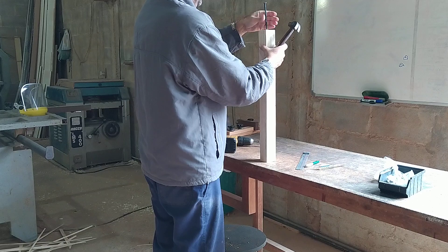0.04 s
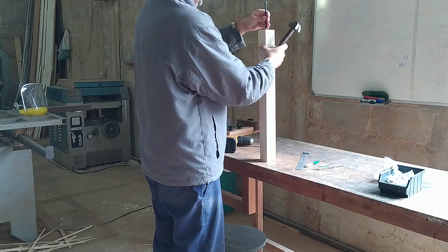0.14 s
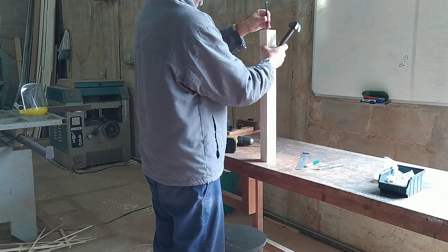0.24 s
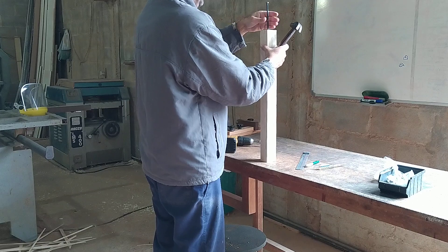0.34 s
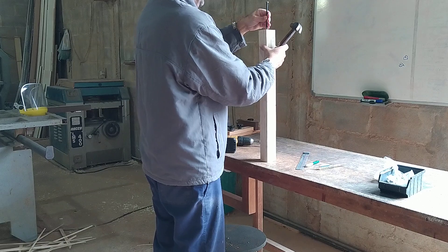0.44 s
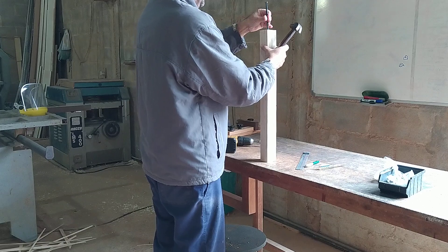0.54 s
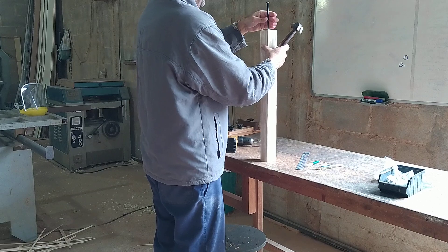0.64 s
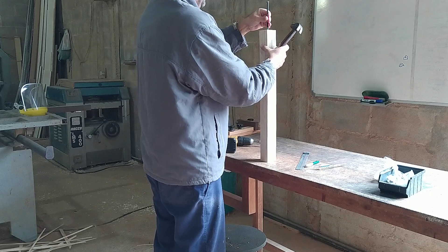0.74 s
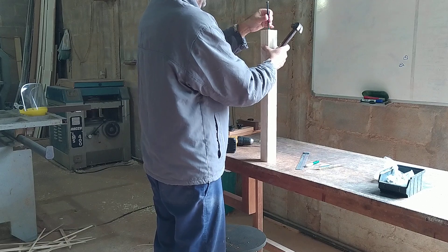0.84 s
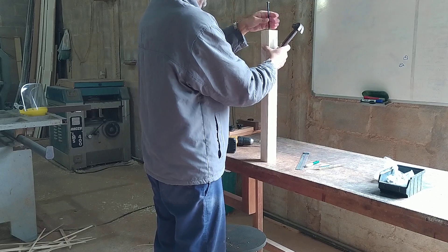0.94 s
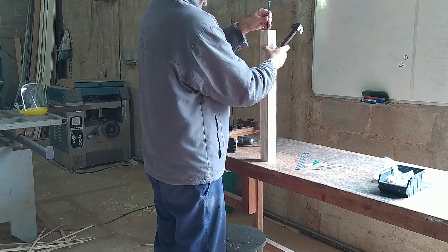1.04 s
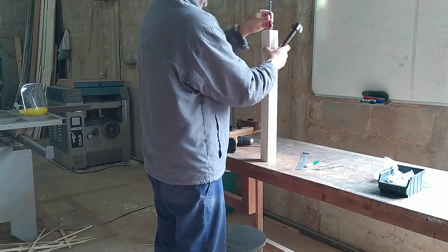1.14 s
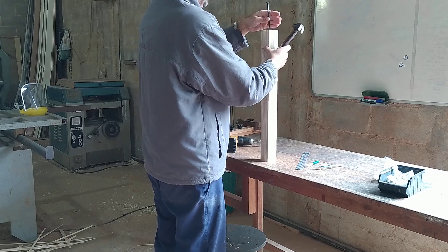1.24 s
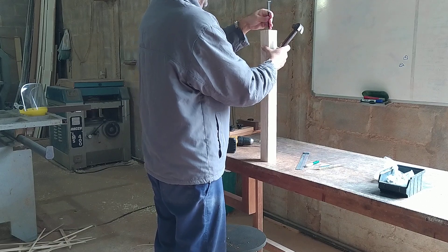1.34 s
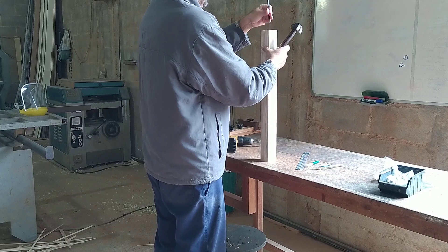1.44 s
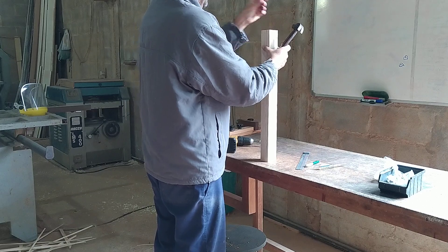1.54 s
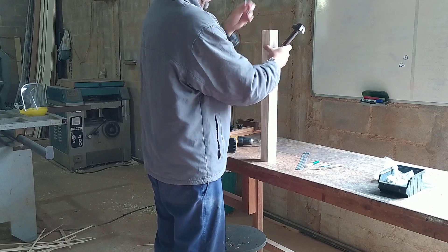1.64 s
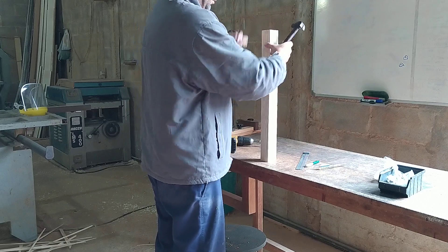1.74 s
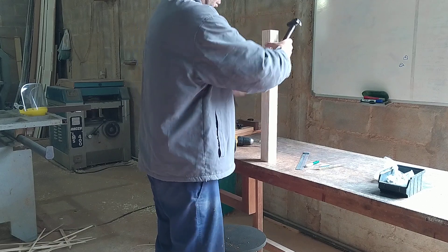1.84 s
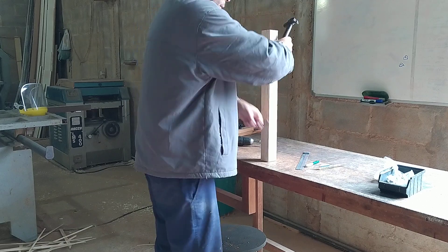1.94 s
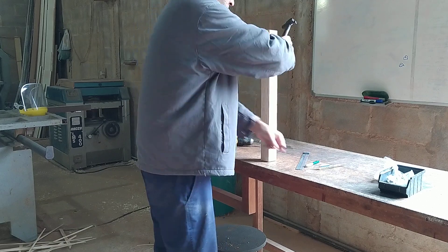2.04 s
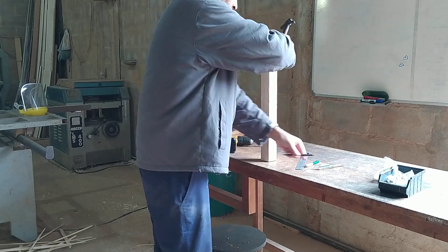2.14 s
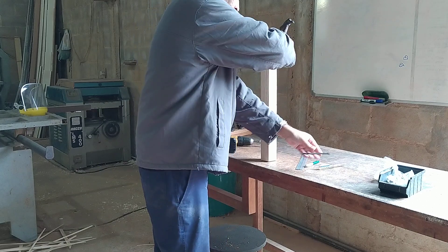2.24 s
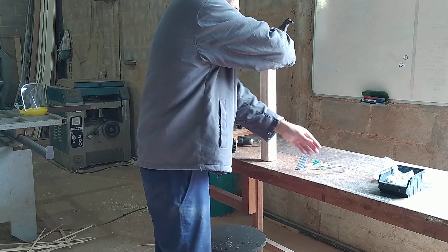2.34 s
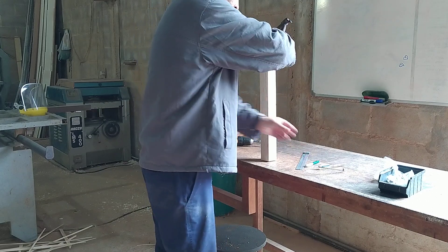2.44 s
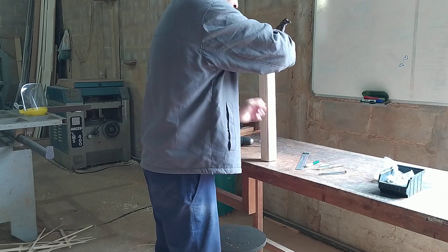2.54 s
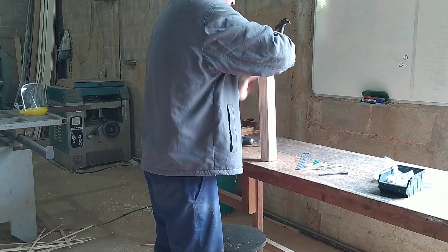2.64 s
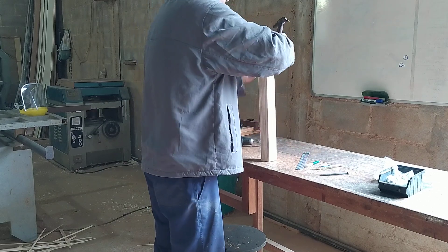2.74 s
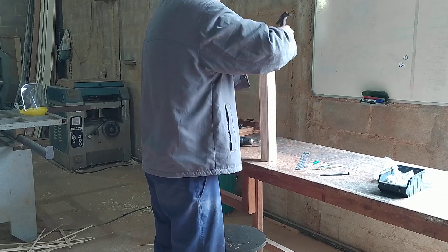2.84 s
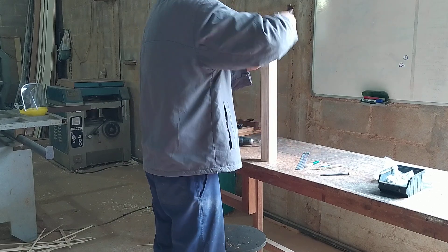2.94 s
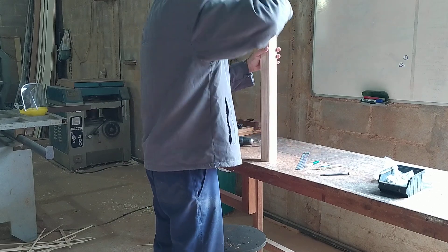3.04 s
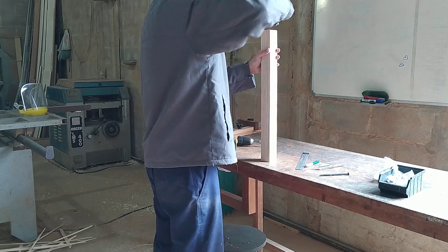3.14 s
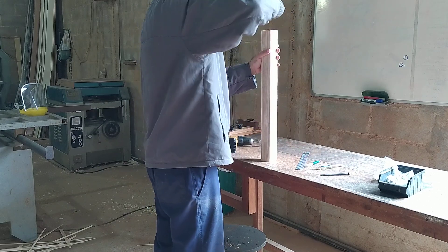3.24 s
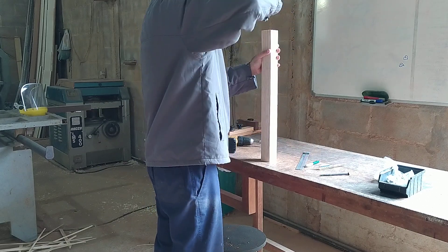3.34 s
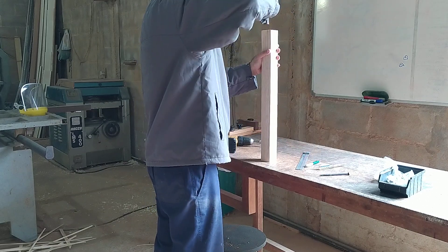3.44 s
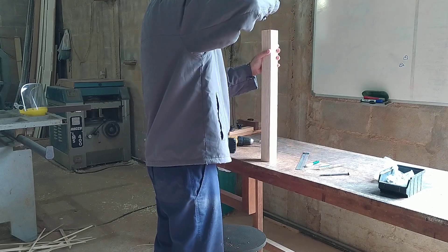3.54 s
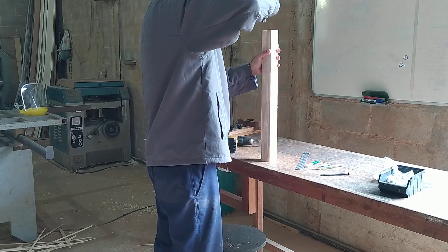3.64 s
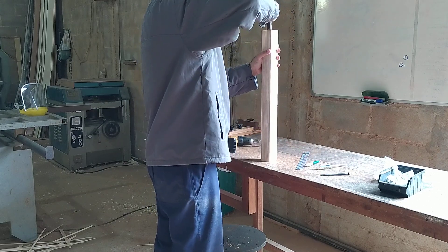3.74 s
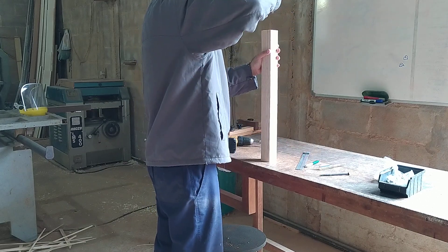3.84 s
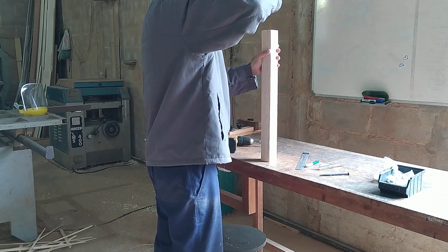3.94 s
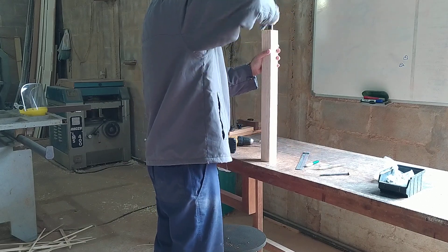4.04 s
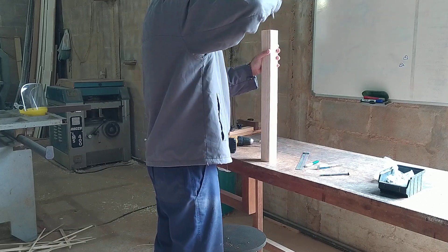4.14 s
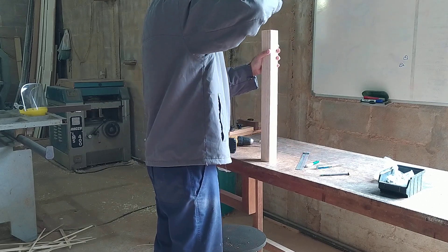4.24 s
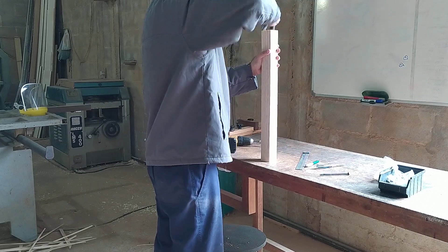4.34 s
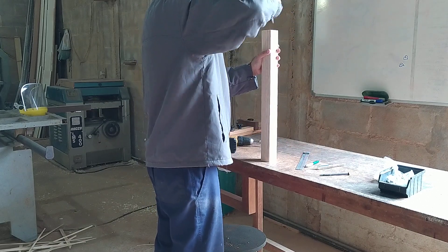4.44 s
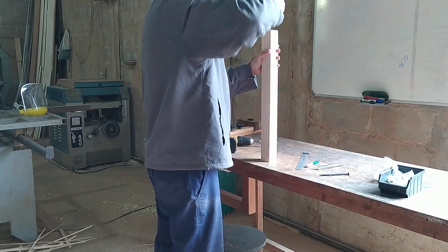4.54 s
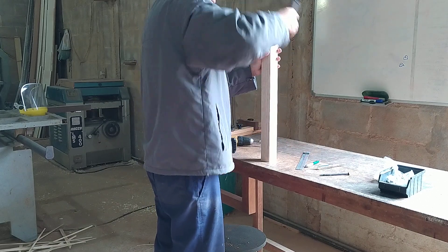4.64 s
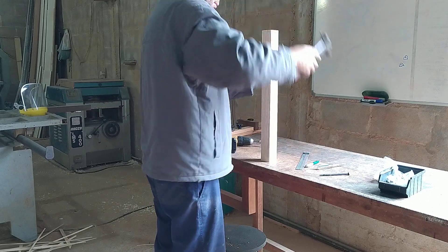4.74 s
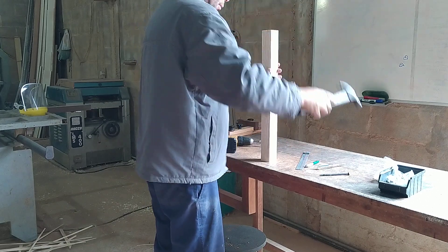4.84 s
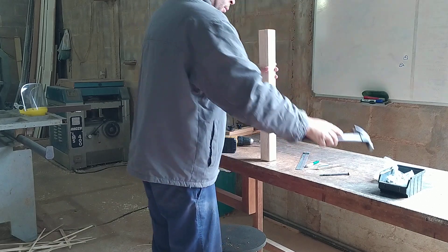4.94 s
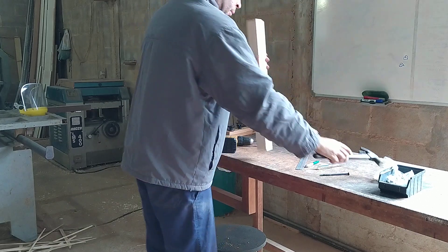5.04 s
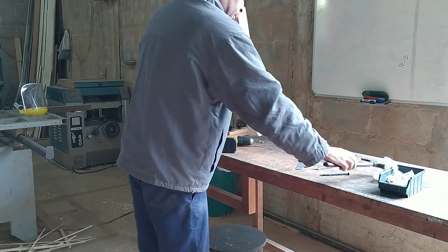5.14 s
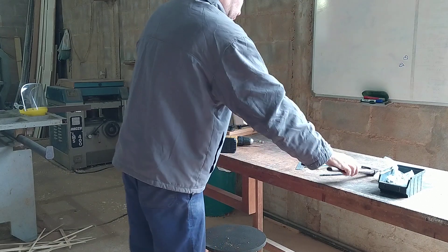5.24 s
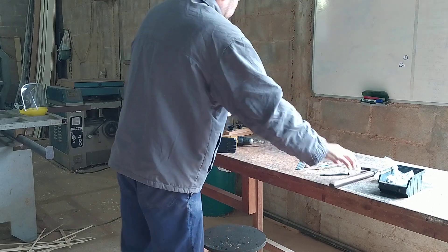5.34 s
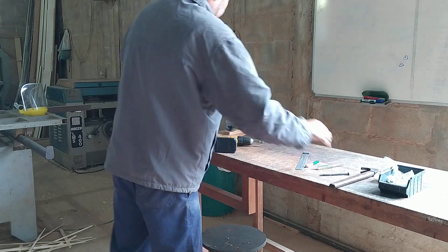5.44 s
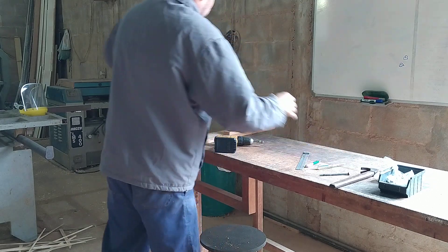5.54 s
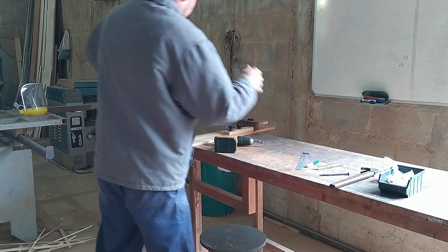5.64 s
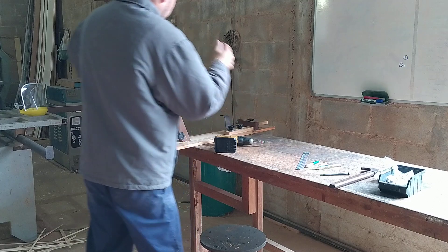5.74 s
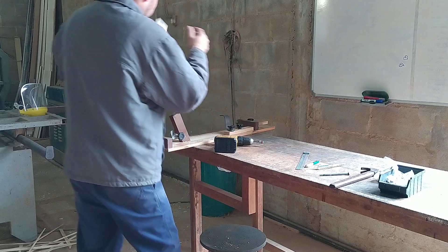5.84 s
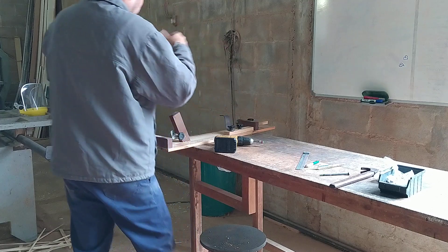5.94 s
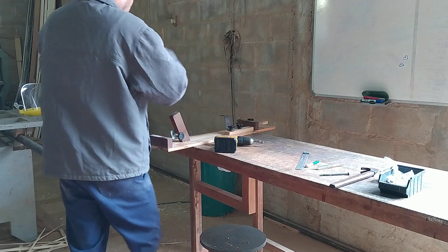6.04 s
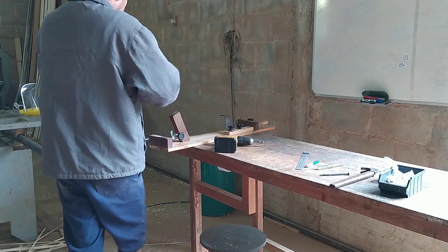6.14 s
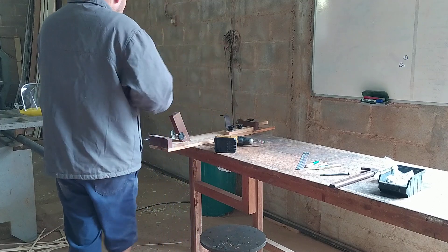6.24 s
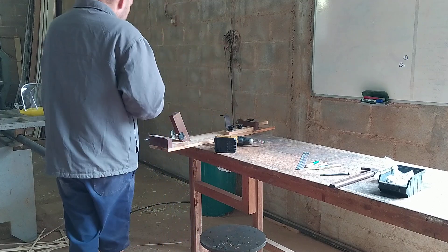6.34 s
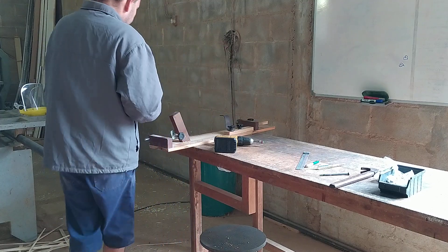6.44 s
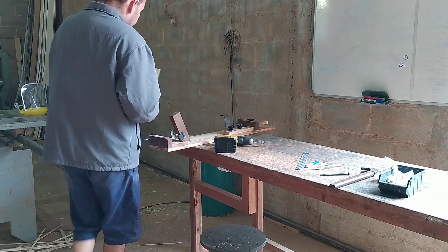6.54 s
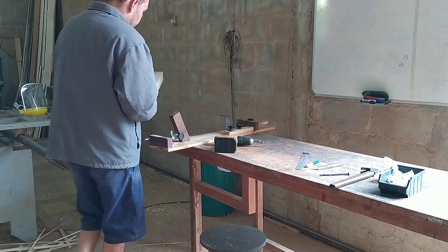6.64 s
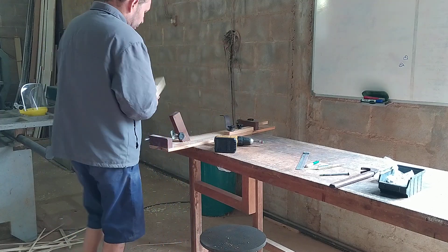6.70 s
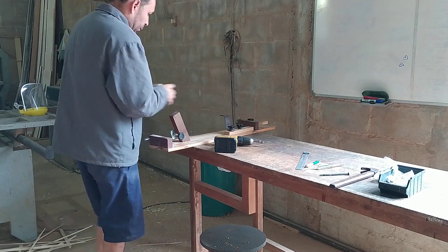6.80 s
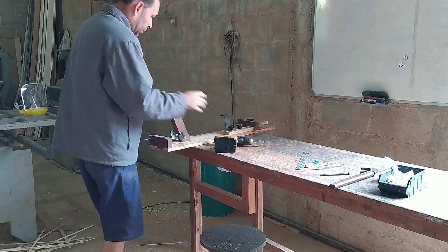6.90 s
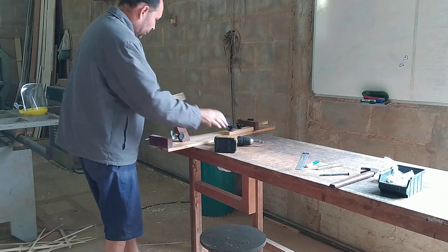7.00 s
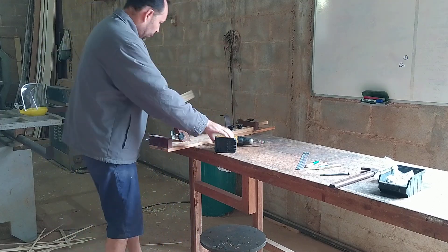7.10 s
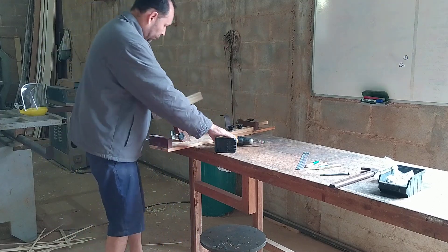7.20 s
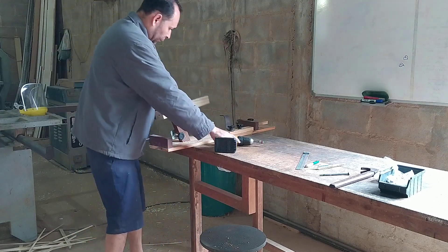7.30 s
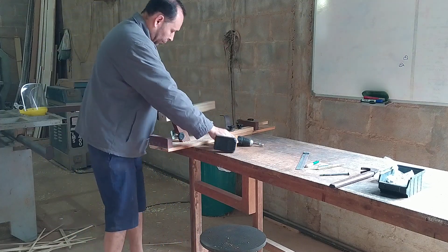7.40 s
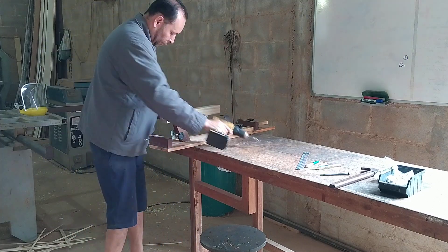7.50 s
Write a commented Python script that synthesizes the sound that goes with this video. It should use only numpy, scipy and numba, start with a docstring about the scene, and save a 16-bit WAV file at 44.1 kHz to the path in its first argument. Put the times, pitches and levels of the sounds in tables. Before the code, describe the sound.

A thin steel piece drops and rings, a hammer strikes a point into wood three times and is put down on a workbench.

```python
"""Three hammer blows drive a steel point into an upright wooden post, which rings and thumps the bench.
Before them the point ticks on the end grain, a hand grips the post, and a thin steel piece drops,
bounces and rings. Afterwards the hammer is laid down and the worker moves off, jacket rustling,
while an engine pulls away outside. A phone a few metres off hears mostly the hard-walled
woodshop; its limiter flattens the loud hits."""
import sys
import numpy as np
from scipy import signal
from scipy.fft import rfft, irfft, next_fast_len
from scipy.io import wavfile
from scipy.ndimage import uniform_filter1d
from numba import njit

SR = 44100
rng = np.random.default_rng(int(sys.argv[2]) if len(sys.argv) > 2 else 0)


def materialize(psi):
    """Save the field psi as 16-bit PCM at rate SR to the path in sys.argv[1].

    A 1-D psi becomes a single channel; in a 2-D psi each row is a channel.
    """
    bounded = np.clip(np.atleast_2d(psi).T, -1, 1)
    quanta = np.round(bounded * 32767).astype(np.int16)
    wavfile.write(sys.argv[1], SR, quanta)


N = 333717
TIME = np.arange(N) / SR


def amp(db):
    """Decibels to gain."""
    return 10 ** (np.asarray(db) / 20)


def unit(x):
    """Scale to unit energy."""
    return x / np.sqrt(np.sum(x ** 2))


def decay(t, t60_s):
    """Exponential fall, 60 dB in t60_s."""
    return np.exp(-np.log(1000) * t / t60_s)


def along(points, hz):
    """Interpolate (Hz, value) points on a log-frequency axis."""
    point_hz, value = np.transpose(sorted(points))
    return np.interp(np.log(hz + 1), np.log(point_hz), value)


def curve(points):
    """Interpolate (s, value) points at every sample."""
    return np.interp(TIME, *np.transpose(points))


def walk(rate_hz):
    """Smooth random drift of unit spread."""
    hold = int(SR / rate_hz)
    steps = np.repeat(rng.standard_normal(N // hold + 1), hold)
    drift = uniform_filter1d(uniform_filter1d(steps, hold), hold)[:N]
    return drift / drift.std()


def add(track, start_s, sound):
    """Mix a sound into a track in place."""
    i = int(start_s * SR)
    track[..., i:i + sound.shape[-1]] += sound[..., :N - i]


def stereo_noise(colour, size=N, apart_hz=1050):
    """Diffuse noise at two microphones: alike in the bass, unrelated in the treble."""
    fft_size = next_fast_len(size, True)
    hz = np.arange(fft_size // 2 + 1) * SR / fft_size
    coherence = 0.92 * np.exp(-(hz / apart_hz) ** 2)
    white = rfft(rng.standard_normal((2, fft_size)))
    mid, side = white * np.sqrt([1 + coherence, 1 - coherence]) * amp(along(colour, hz))
    noise = irfft(np.array([mid + side, mid - side]), fft_size)[:, :size]
    return noise / noise.std()


def crack(colour, tilt_db_oct, size=2048):
    """Minimum-phase contact pulse; a harder contact tilts its spectrum up."""
    hz = np.arange(size // 2 + 1) * SR / size
    cepstrum = irfft(np.log(amp(along(colour, hz) + tilt_db_oct * np.log2(hz + 20))))
    cepstrum[1:size // 2] *= 2
    cepstrum[size // 2 + 1:] = 0
    return unit(irfft(np.exp(rfft(cepstrum))))


def hits(rows, colour):
    """One contact pulse per (s, dB, dB/octave) row."""
    track = np.zeros(N)
    for start_s, db, tilt_db_oct in rows:
        add(track, start_s, amp(db) * crack(colour, tilt_db_oct))
    return track


def ring(modes, t60_s, swell_s=0.00027, apart_hz=1500, lag_s=0.0002):
    """Free ringing of (Hz, dB) modes, left first; higher modes differ more in stereo phase."""
    t = TIME[:SR // 2]
    stereo_t = np.array([t, t - lag_s])
    tones = 0
    for hz, db in modes:
        phase = rng.uniform(0, 2 * np.pi) + hz / apart_hz * rng.standard_normal((2, 1))
        tones += amp(db) * np.sin(2 * np.pi * hz * stereo_t + phase)
    return unit(tones * decay(t, t60_s) * (1 - np.exp(-t / swell_s)))


def ringing(rows, modes, t60_s, swell_s=0.0025):
    """The same ring after every hit, scaled to its level."""
    track = np.zeros((2, N))
    tone = ring(modes, t60_s, swell_s)
    for start_s, db, _ in rows:
        add(track, start_s, amp(db) * tone)
    return track


def from_the_left(x, lag_samples=19):
    """Outdoor sound reaches the left microphone first."""
    return np.array([x[0], np.roll(x[1], lag_samples)])


# Room reverberation. Each row: frequency in Hz, T60 in seconds.
ROOM_T60 = [(100, 1), (300, 0.76), (900, 0.68), (2500, 0.63), (5000, 0.41), (10000, 0.4)]


def workshop(x, direct_db, early_db, tail_db, early_s=0.036, lag_samples=8):
    """Direct sound (left first), early echoes off bench and wall, then the diffuse tail."""
    t = TIME[:SR]
    flat = [(20, 0), (20000, 0)]
    early = stereo_noise(flat, SR) * np.exp(-t / early_s)
    hz, frame_s, frames = signal.stft(stereo_noise(flat, SR), SR, nperseg=256)
    fade = decay(frame_s, along(ROOM_T60, hz)[:, None])
    tail = signal.istft(frames * fade, SR)[1][:, :SR] * (1 - np.exp(-t / 0.0041))
    response = np.sqrt(2) * (amp(tail_db) * unit(tail) + amp(early_db) * unit(early))
    response[0, 0] += amp(direct_db)
    response[1, lag_samples] += amp(direct_db)
    return signal.oaconvolve(x[None], response, axes=1)[:, :N]


# Outdoor noise spectrum. Each row: frequency in Hz, gain in dB.
MURMUR_COLOUR = [(25, 6), (45, -28), (75, 0.5), (130, -6.5), (165, 3.5), (210, -6.5), (270, 2), (340, -6),
                 (460, 0.5), (600, -6.5), (830, -6), (1800, -10), (2500, -17), (5000, -81)]


def outdoor_murmur(level_db=-49.5, receding_db=2, receding_s=0.78):
    """Outdoor noise, a little louder at first while a vehicle recedes."""
    db = level_db + receding_db * np.exp(-(TIME / receding_s) ** 2) + 0.8 * walk(6)
    return from_the_left(stereo_noise(MURMUR_COLOUR) * amp(db))


# Traffic drone. Each row: time in seconds, level in dB.
DRONE_LEVEL = [(0.0, -49), (0.69, -47.5), (1.07, -58.5), (2.19, -49), (2.57, -61), (3.6, -38.5),
               (3.77, -43), (4.7, -45), (7.57, -57)]


def traffic_drone(start_hz=56, end_hz=49.2, settle_s=2.6, gain_db=-1):
    """Low, wavering traffic tone whose pitch sinks and settles."""
    hz = end_hz + (start_hz - end_hz) * np.exp(-(TIME / settle_s) ** 2) + 0.53 * walk(8.7)
    db = gain_db + curve(DRONE_LEVEL) + 0.65 * walk(7.3)
    drone = amp(db) * np.sin(2 * np.pi * np.cumsum(hz) / SR)
    return from_the_left([drone, drone])


# Engine speed. Each row: time in seconds, cycle rate in Hz.
ENGINE_SPEED = [(5.7, 34.95), (5.954, 36.11), (6.086, 38.48), (6.4, 40.6), (6.712, 44.36), (6.848, 44.86),
                (7.5, 51.3)]
# Exhaust harmonics. Each row: multiple of the cycle rate, level in dB.
ENGINE_ORDERS = [(2, 6), (3, 2), (5, -1.5), (6, -6), (7, -1), (8, 0), (10, -3.5)]
# Transmission through the building. Each row: frequency in Hz, gain in dB.
WALL_COLOUR = [(200, -7), (266, 7), (286, 5), (298, -7), (334, 4), (357, 12), (367, -5), (402, 11),
               (418, -5), (445, 3)]


def engine(start_s=5.6, fade_in_s=0.46, gain_db=-51, waver_db=1.5, jitter=0.0047):
    """An engine speeds up outside; its harmonics swell as they cross the building's resonances."""
    cycle_hz = curve(ENGINE_SPEED)
    phase = 2 * np.pi * np.cumsum(cycle_hz * (1 + jitter * walk(40))) / SR
    exhaust = np.zeros(N)
    for order, db in ENGINE_ORDERS:
        gain = amp(db + along(WALL_COLOUR, order * cycle_hz) + waver_db * walk(9))
        exhaust += gain * np.sin(order * phase + rng.uniform(0, 2 * np.pi))
    exhaust *= amp(gain_db) * np.clip((TIME - start_s) / fade_in_s, 0, 1)
    return from_the_left([exhaust, exhaust])


# Setting the point, reaching down, walking off.
# Each row: peak time, rise and fall in seconds, level in dB.
MOVES = [(0.3, 0.98, 0.75, -53), (2.3, 0.065, 0.051, -60), (7.5, 1.86, 0.39, -41.5)]
# Cloth and hiss spectrum. Each row: frequency in Hz, gain in dB.
RUSTLE_COLOUR = [(300, -3), (900, 6.5), (1350, -7.5), (1900, 2.5), (2700, 5.5), (3600, -1.5), (7800, -5.5),
                 (9100, -1), (11500, -19), (15500, -40)]


def jacket_rustle(hiss_db=-59.5, flutter_db=0.7):
    """Cloth noise swells and dies with each move, over a faint steady hiss."""
    motion = np.zeros(N)
    for peak_s, rise_s, fall_s, db in MOVES:
        motion += amp(db) * np.exp(-np.maximum((peak_s - TIME) / rise_s, (TIME - peak_s) / fall_s))
    motion *= amp(flutter_db * walk(25))
    return stereo_noise(RUSTLE_COLOUR) * np.hypot(amp(hiss_db), motion)


# Spectrum of skin on wood. Each row: frequency in Hz, gain in dB.
RUB_COLOUR = [(300, -20), (580, 0), (1300, 7), (2600, -9), (5000, -30)]


def hand_on_post(start_s=2.2, attack_s=0.081, fade_s=1, level_db=-49.5):
    """A hand rubs up the post and slows to a grip."""
    age_s = np.maximum(TIME - start_s, 0)
    speed = np.minimum(age_s / attack_s, 1) * np.exp(-(age_s / fade_s) ** 2)
    return stereo_noise(RUB_COLOUR) * speed * amp(level_db + walk(30.8))


# Light clicks, a bench knock, a tool lifted. Each row: start in seconds, level in dB, tilt in dB/octave.
CLICKS = [(5.781, -12, -1), (5.884, -15.5, -2), (6.33, -21, -0.5), (6.347, -15.5, -0.5), (6.37, -17, -2.5),
          (7.492, -9, -3)]
KNOCKS = [(6.61, -17, -2.5)]
PICKUP = [(7.493, -17.5, 2.5), (7.515, -15.5, -3)]
# Contact spectra and the tool's body modes. Each row: frequency in Hz, gain in dB.
CLICK_COLOUR = [(300, -17), (1000, -4), (2200, 4.5), (5000, -4.5), (7500, -2), (9800, 7.5), (12000, -5.5),
                (15500, -16)]
KNOCK_COLOUR = [(100, -25), (300, 14.5), (700, 0), (1000, 8), (2200, -17), (5000, -38)]
TOOL_MODES = [(968, 1), (1164, 2), (2260, -8)]


def handling():
    """Handled things click and knock softly; last, a wooden tool is taken up and rings."""
    tool = amp(12) * ringing(PICKUP, TOOL_MODES, t60_s=0.3)
    contacts = hits(CLICKS, CLICK_COLOUR) + hits(KNOCKS + PICKUP, KNOCK_COLOUR)
    return workshop(contacts, direct_db=-2, early_db=6, tail_db=3) + tool


# Touches of the point. Each row: start in seconds, level in dB.
TICKS = [(0.192, -31), (0.36, -35), (0.474, -35.5), (.631, -31.5), (.763, -24.5), (0.927, -30.5),
         (1.064, -27), (1.0667, -18), (1.377, -27)]
# Contact spectrum and modes of the point in the wood. Each row: frequency in Hz, gain in dB.
TICK_COLOUR = [(1200, 2.5), (2700, -10), (3800, 5), (4400, -21), (6600, 4.5), (10800, 6), (12000, -15),
               (15500, -16)]
TICK_MODES = [(2605, 8), (3680, 3), (5070, 3), (7340, 1), (10100, 3)]


def point_ticks(t60_s=0.015, spread_db=2):
    """The steel tip pricks the end grain; each touch reweights its modes, and the fingers damp them."""
    pricks = hits([(start_s, db, 0) for start_s, db in TICKS], TICK_COLOUR)
    for start_s, db in TICKS:
        modes = [(hz, mode_db + spread_db * rng.standard_normal()) for hz, mode_db in TICK_MODES]
        add(pricks, start_s, amp(db + 2.5) * ring(modes, t60_s)[0])
    return workshop(pricks, direct_db=1, early_db=8, tail_db=4.5, early_s=0.024)


# Steel bouncing on the bench. Each row: start in seconds, knock level in dB, tilt in dB/octave,
# swing of the lowest mode in dB, swing of the upper modes in dB.
BOUNCES = [(2.406, 7.5, -0.5, -23, -23), (2.4148, 8.5, -0.5, -3, -3), (2.4211, 15.5, 0.6, -28, 4.5),
           (2.469, -12, -7, -2.5, 5), (2.517, 3.5, 0, 2.5, 5), (2.553, 8, 2, -2.5, 8.5),
           (2.584, -9, -0.5, -13, -1.5), (2.611, 4, 0, -6.5, 4.5)]
# Contact spectrum and bending modes. Each row: frequency in Hz, gain in dB.
BOUNCE_COLOUR = [(100, -28.5), (280, -8), (1100, -1), (3200, -5), (4600, -14.5), (7500, -20.5),
                 (11000, -40), (15000, -77)]
STEEL_MODES = [(4552, -7), (8474, -3), (13647, -27)]


def dropped_steel(t60_s=1.0, rest_t60_s=0.15, swell_s=0.0033, ring_db=-22):
    """Each bounce knocks the bench and feeds or chokes the steel's modes; lying flat damps them."""
    knocks = hits([row[:3] for row in BOUNCES], BOUNCE_COLOUR)
    starts_s, _, _, low_db, upper_db = np.transpose(BOUNCES)
    latest = np.maximum(np.searchsorted(starts_s, TIME) - 1, 0)
    current_t60_s = np.where(TIME > starts_s[-1], rest_t60_s, t60_s)
    fade = (TIME > starts_s[0]) * decay(np.abs(TIME - starts_s[latest]), current_t60_s)
    tone = np.zeros(N)
    for (hz, mode_db), swing_db in zip(STEEL_MODES, (low_db, upper_db, upper_db)):
        swing = amp(ring_db + mode_db + swing_db[latest]) * fade
        tone += uniform_filter1d(swing, int(swell_s * SR) + 1) * np.sin(2 * np.pi * hz * TIME)
    wobble = amp(2 * np.array([walk(60), walk(60)]))  # per channel, as the piece turns
    ping = wobble * workshop(tone, direct_db=0, early_db=-12, tail_db=-13, lag_samples=20)
    return workshop(knocks, direct_db=-21, early_db=-1, tail_db=-7) + ping


# Handle and head meeting the bench. Each row: start in seconds, level in dB, tilt in dB/octave.
HANDLE_HITS = [(5.2945, -3, 3), (5.2995, 11, 2), (5.423, -5.5, 1)]
HEAD_HITS = [(5.4086, 10.5, 1), (5.416, -0.5, 3), (5.503, -1.5, -2)]
# Their contact spectra. Each row: frequency in Hz, gain in dB.
HANDLE_COLOUR = [(70, -22), (260, 4.5), (550, 4), (980, 1.5), (1400, -5.5), (3000, -14), (4000, -33.5),
                 (9400, -35.5), (14000, -56)]
HEAD_COLOUR = [(70, -29), (270, -18.5), (540, -8), (800, -13), (1250, -6.5), (2500, -8.5), (4500, -16.5),
               (8800, -29.5), (11000, -48), (14000, -90)]
# Modes of the head, its first clack and the bench top. Each row: frequency in Hz, gain in dB.
HEAD_MODES = [(2140, -5), (2304, -4), (2336, -1), (2455, -2), (2552, 3), (2599, -3)]
CLACK_MODES = [(2700, 0), (3000, 0), (3321, -3), (4791, -8)]
BENCH_MODES = [(284, -3.5), (443, 3), (528, 5), (1208, 1.5), (1641, -1)]


def hammer_laid_down():
    """The handle thuds on the bench, then the steel head clacks, rings and rocks once."""
    handle = workshop(hits(HANDLE_HITS, HANDLE_COLOUR),
                      direct_db=1, early_db=14, tail_db=4.5, early_s=0.03, lag_samples=11)
    head = workshop(hits(HEAD_HITS, HEAD_COLOUR), direct_db=-7, early_db=9.5, tail_db=6, lag_samples=10)
    head_ring = amp(8.5) * ringing(HEAD_HITS, HEAD_MODES, t60_s=0.46)
    clack = amp(7) * ringing(HEAD_HITS[:1], CLACK_MODES, t60_s=0.05)
    bench = amp(6) * ringing(HANDLE_HITS + HEAD_HITS, BENCH_MODES, t60_s=0.42, swell_s=0.0072)
    return handle + head + head_ring + clack + bench


def crushing_fibres(t60_s=0.06, highpass_hz=2400):
    """A sharp push plus the random high crackle of fibres giving way."""
    t = TIME[:SR // 10]
    fibres = unit(rng.standard_normal(len(t)) * decay(t, t60_s))
    push = signal.sosfilt(signal.butter(2, highpass_hz, "high", fs=SR, output="sos"), fibres)
    push[0] += 1
    return push


def sinking_echo(start_hz=1140, end_hz=740, sink_s=0.15, t60_s=0.48, upper_ratio=1.62, upper_db=-9):
    """A two-tone echo from the room sinks in pitch as it fades after each blow."""
    t = TIME[:SR // 2]
    waver = 1 + 0.0144 * walk(50)[:len(t)]
    hz = (end_hz + (start_hz - end_hz) * np.exp(-t / sink_s)) * waver
    phase = 2 * np.pi * np.cumsum(hz) / SR
    envelope = (1 - np.exp(-t / 0.0043)) * decay(t, t60_s)
    return unit((np.sin(phase) + amp(upper_db) * np.sin(upper_ratio * phase)) * envelope)


# Hammer blows. Each row: start in seconds, level in dB, tilt in dB/octave.
BLOWS = [(3.785, 14.5, 0.2), (4.0934, 18, 1.02), (4.386, 19, 1.3)]
# Spectra of blow and bench thump, and the post's modes. Each row: frequency in Hz, gain in dB.
BLOW_COLOUR = [(60, -49), (140, -15), (220, -19.5), (290, -1.5), (950, -7.5), (1400, -7), (3700, -18),
               (5600, -25), (7800, -26), (9000, -21.5), (10400, -25.5), (11500, -38), (15500, -48)]
THUMP_COLOUR = [(45, -18.5), (80, -21), (120, -6), (180, -5), (300, -7), (1000, -79)]
POST_MODES = [(281, -2), (343, -7), (445, 3), (497, -2), (527, -2), (590, -6), (717, -3), (806, -3),
              (837, -1), (952, 0), (1112, -2), (1863, -6), (2146, -8), (3828, -18)]


def hammer_blows(thump_db=-10, thump_db_per_db=4.1):
    """The point crushes into the grain; the post rings, and harder blows thump the bench far more."""
    hardest_db = max(db for _, db, _ in BLOWS)
    shoves = [(start_s, hardest_db + thump_db_per_db * (db - hardest_db), 0) for start_s, db, _ in BLOWS]
    thump = workshop(amp(thump_db) * hits(shoves, THUMP_COLOUR), direct_db=-8, early_db=3.5, tail_db=-4)
    force, echoes = np.zeros(N), np.zeros(N)
    for start_s, db, tilt_db_oct in BLOWS:
        contact = signal.fftconvolve(crack(BLOW_COLOUR, tilt_db_oct), crushing_fibres())
        add(force, start_s, amp(db) * contact)
        add(echoes, start_s, amp(db) * sinking_echo())
    post = amp(7.5) * ringing(BLOWS, POST_MODES, t60_s=0.54, swell_s=0.003)
    room_chirp = workshop(echoes, direct_db=2.5, early_db=-5, tail_db=-10)
    impact = workshop(force, direct_db=-9, early_db=5.5, tail_db=5.5)
    return impact + post + room_chirp + thump


def scene():
    """Stereo sum of the bench work, the outdoors and the worker's movements."""
    bench_work = hammer_blows() + point_ticks() + dropped_steel() + hammer_laid_down() + handling()
    outdoors = engine() + traffic_drone() + outdoor_murmur()
    return bench_work + outdoors + jacket_rustle() + hand_on_post()


@njit
def follow(x, attack, release):
    """One-pole envelope follower with separate rise and fall coefficients."""
    envelope, level = np.empty(len(x)), 0.
    for i in range(len(x)):
        level += (x[i] - level) * (attack if x[i] > level else release)
        envelope[i] = level
    return envelope


def record(dry, ceiling_db=-4, attack_s=0.0005, release_s=0.07, ahead_samples=44, lowpass_hz=16000):
    """The phone's look-ahead limiter holds the hits down and lets their tails swell; the top is cut."""
    attack, release = 1 - np.exp(-1 / (np.array([attack_s, release_s]) * SR))
    envelope = follow(np.abs(dry).max(axis=0), attack, release)
    reduction = np.maximum(1, np.roll(envelope, -ahead_samples) / amp(ceiling_db))
    limited = np.clip(dry / reduction, -1, 1)
    return signal.sosfilt(signal.ellip(8, 0.2, 70, lowpass_hz, fs=SR, output="sos"), limited)


dry = scene()
out = record(dry)
materialize(out)
```